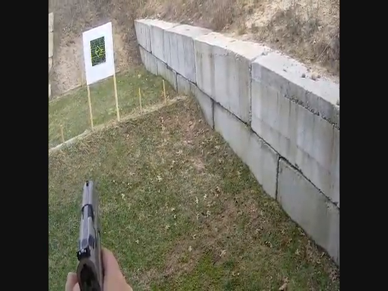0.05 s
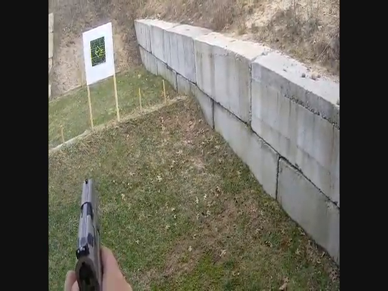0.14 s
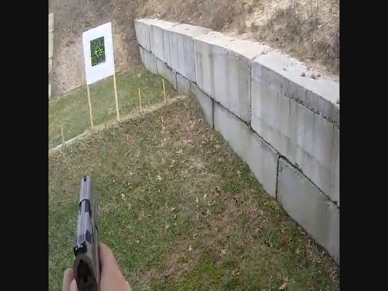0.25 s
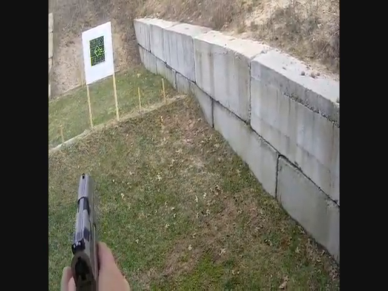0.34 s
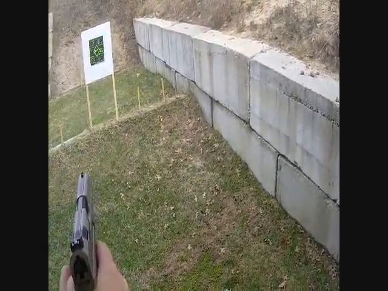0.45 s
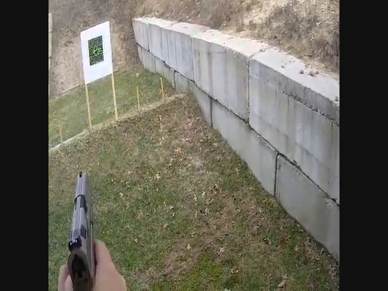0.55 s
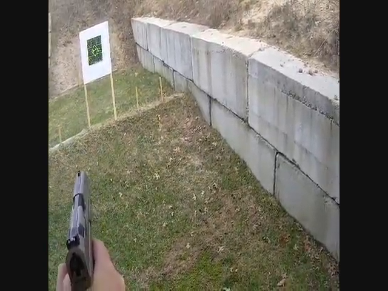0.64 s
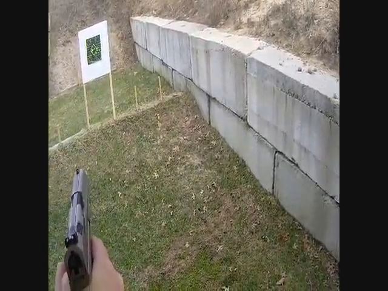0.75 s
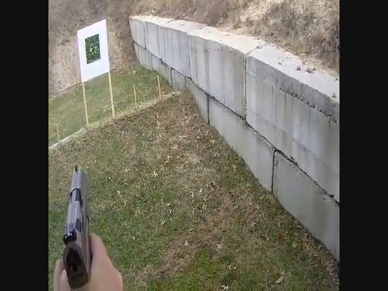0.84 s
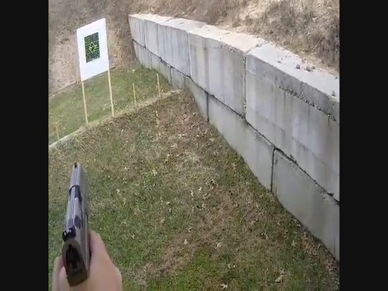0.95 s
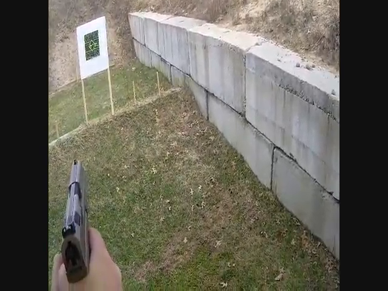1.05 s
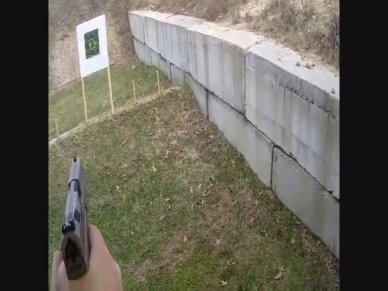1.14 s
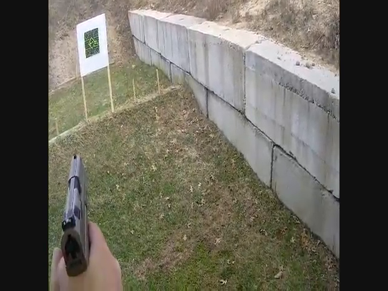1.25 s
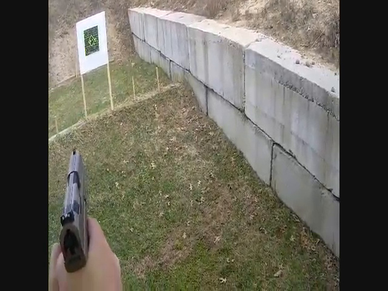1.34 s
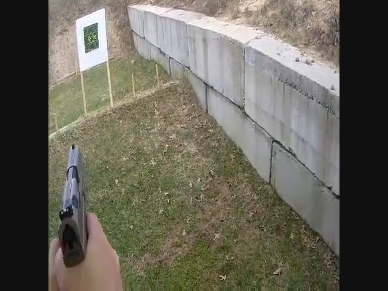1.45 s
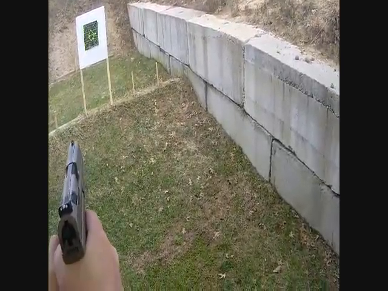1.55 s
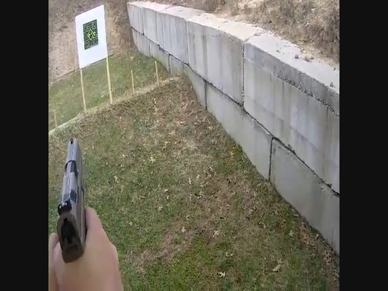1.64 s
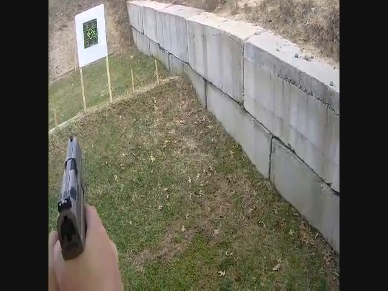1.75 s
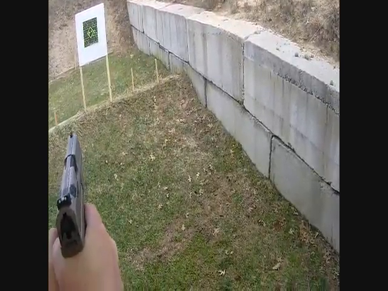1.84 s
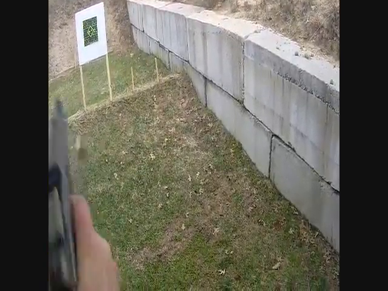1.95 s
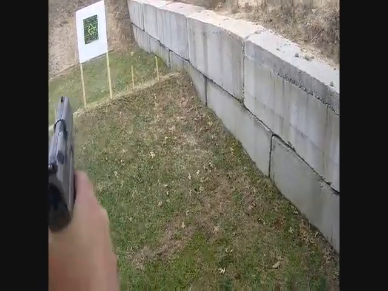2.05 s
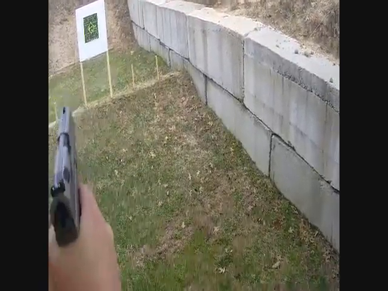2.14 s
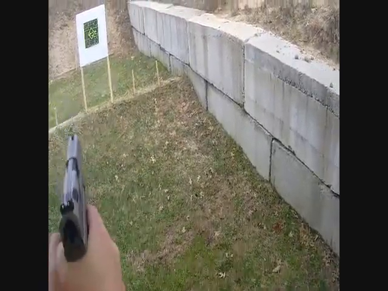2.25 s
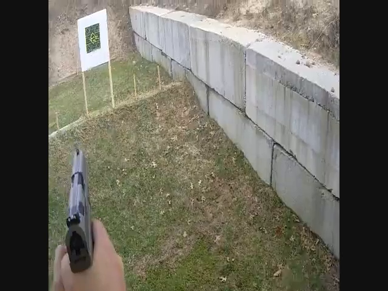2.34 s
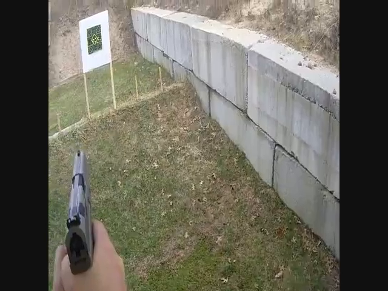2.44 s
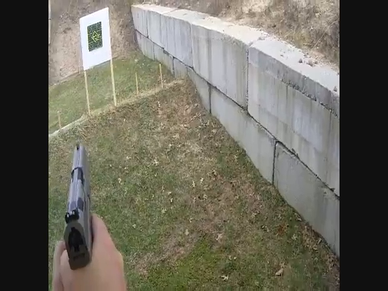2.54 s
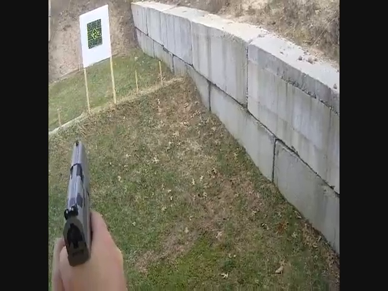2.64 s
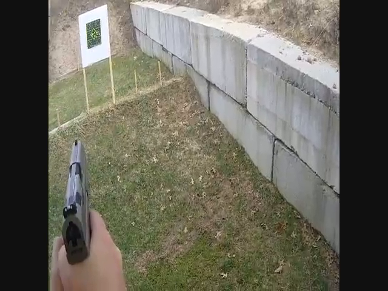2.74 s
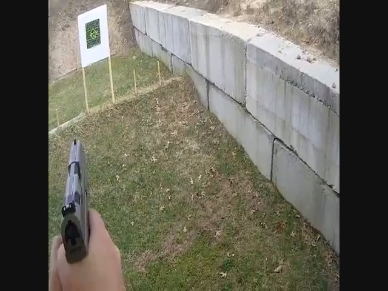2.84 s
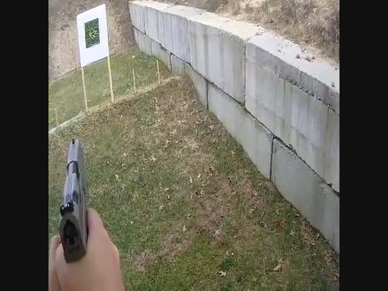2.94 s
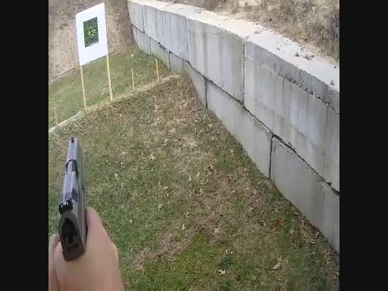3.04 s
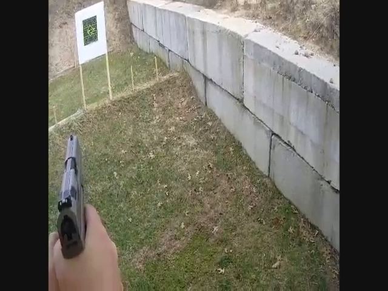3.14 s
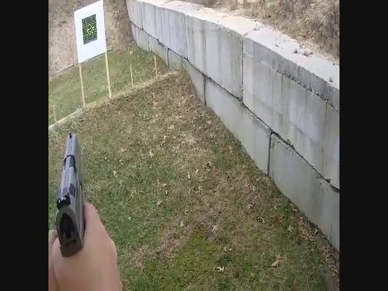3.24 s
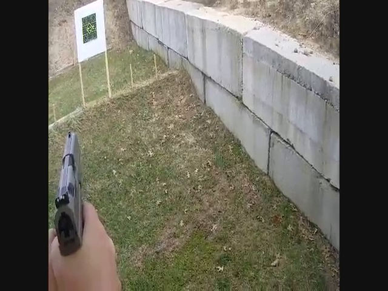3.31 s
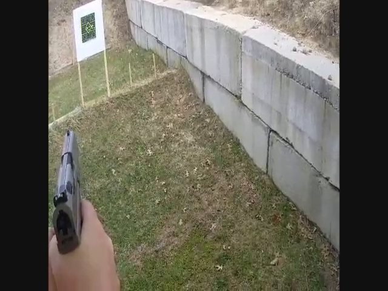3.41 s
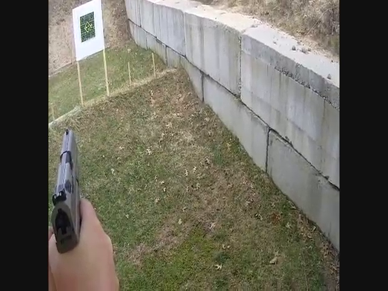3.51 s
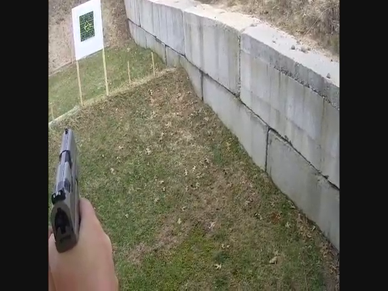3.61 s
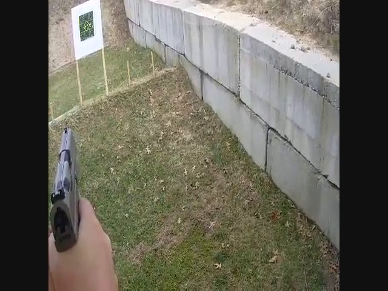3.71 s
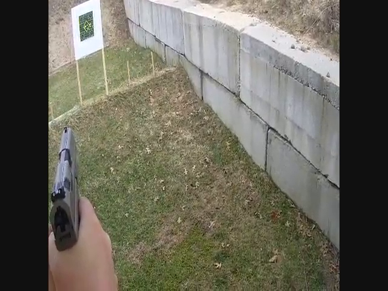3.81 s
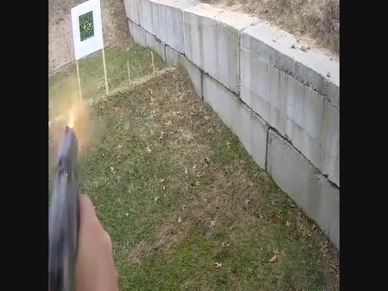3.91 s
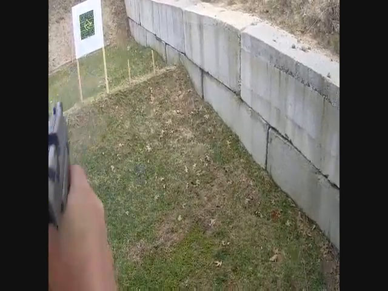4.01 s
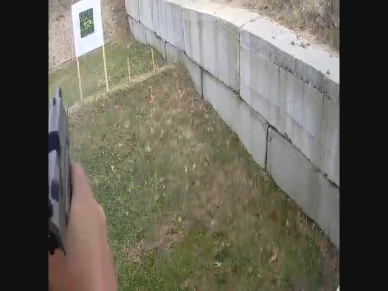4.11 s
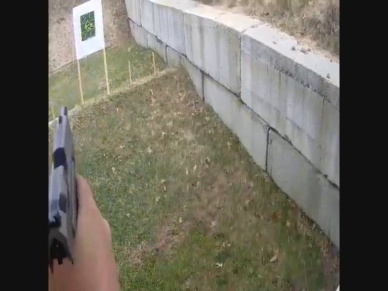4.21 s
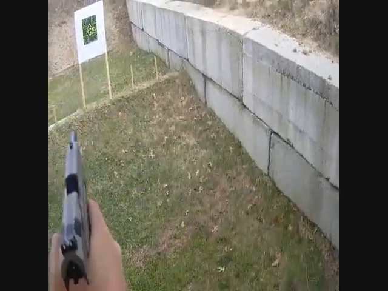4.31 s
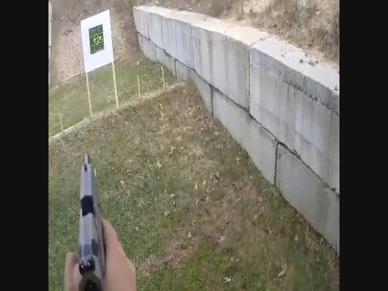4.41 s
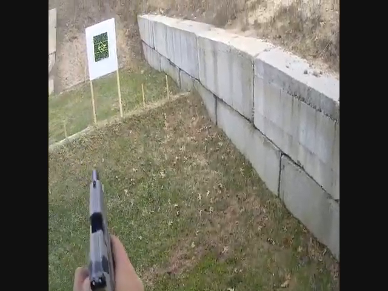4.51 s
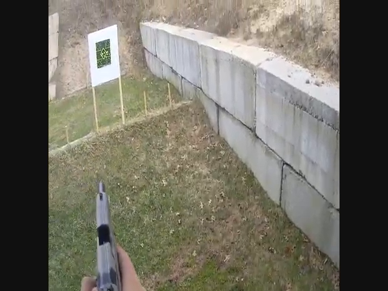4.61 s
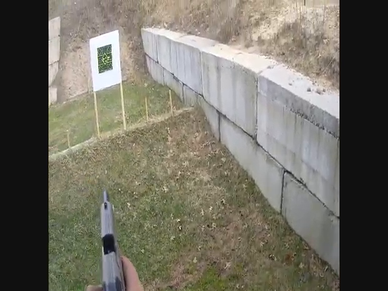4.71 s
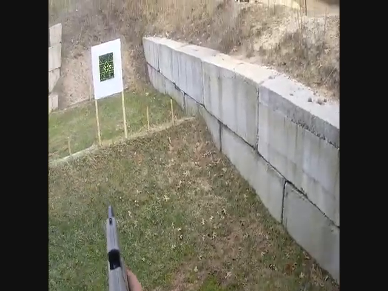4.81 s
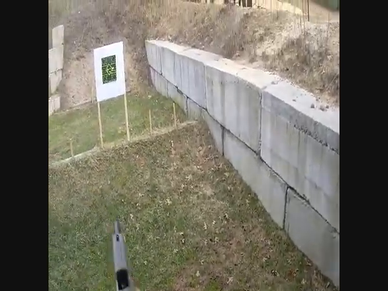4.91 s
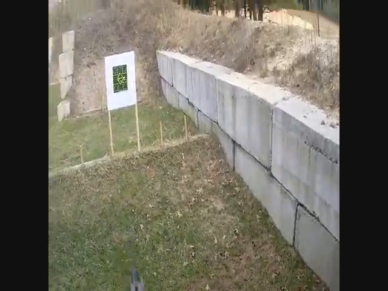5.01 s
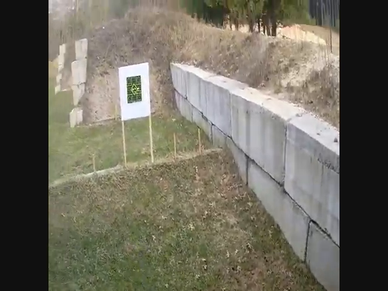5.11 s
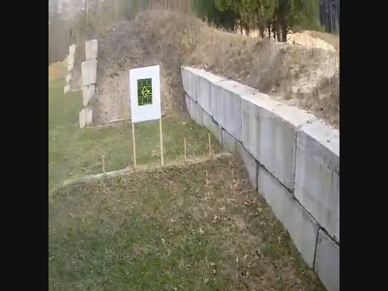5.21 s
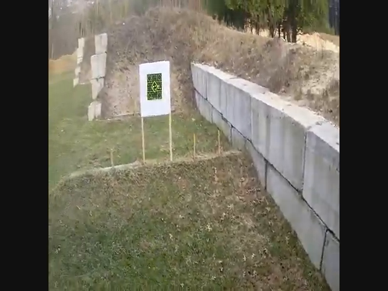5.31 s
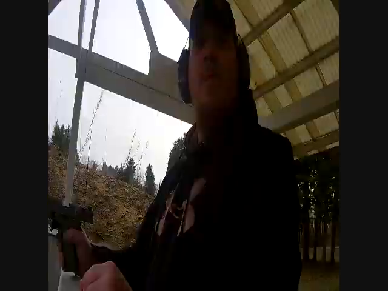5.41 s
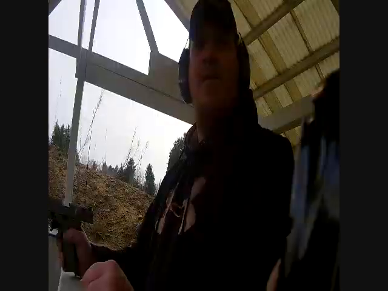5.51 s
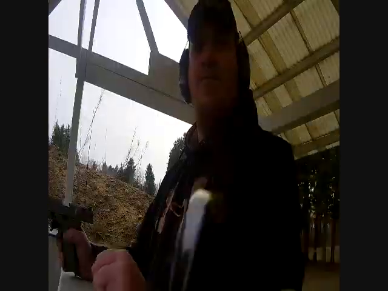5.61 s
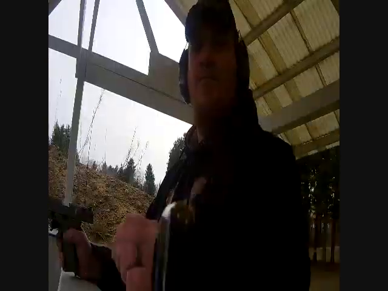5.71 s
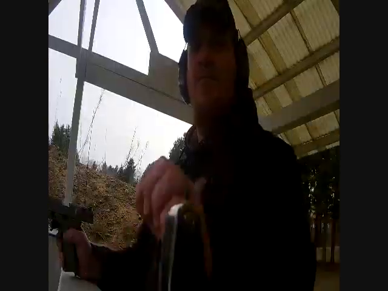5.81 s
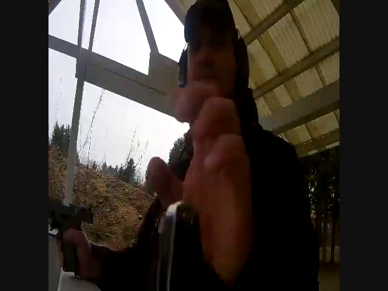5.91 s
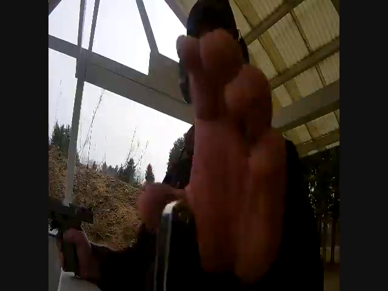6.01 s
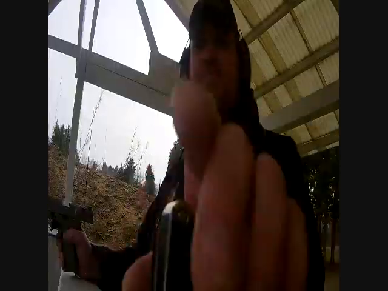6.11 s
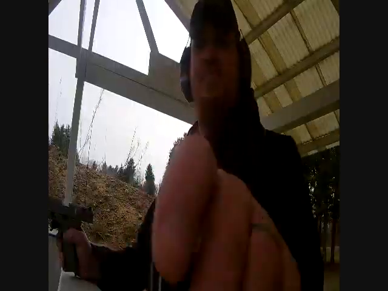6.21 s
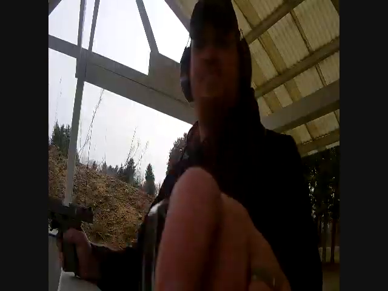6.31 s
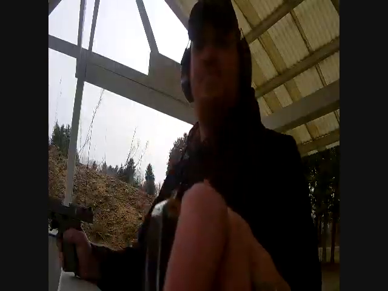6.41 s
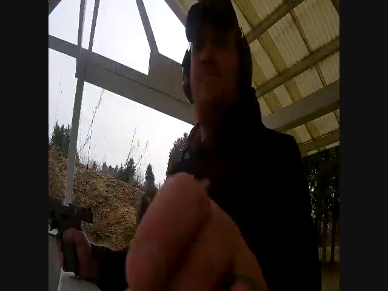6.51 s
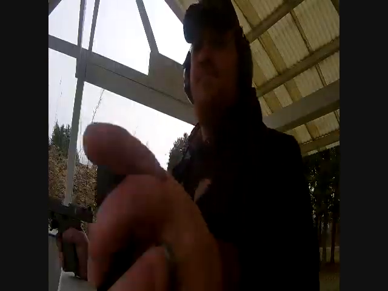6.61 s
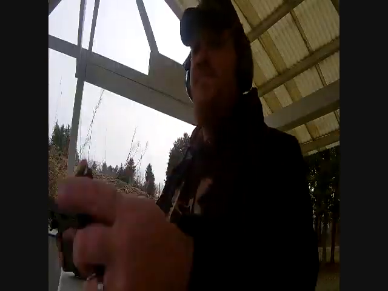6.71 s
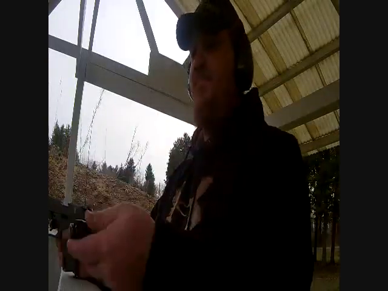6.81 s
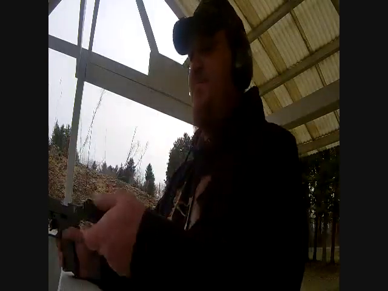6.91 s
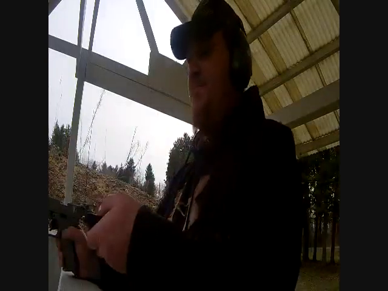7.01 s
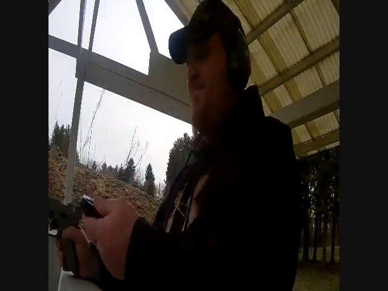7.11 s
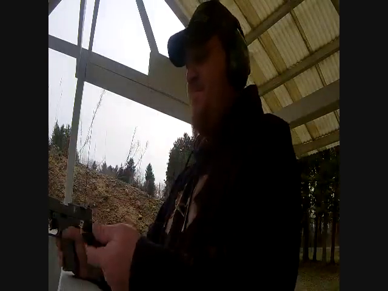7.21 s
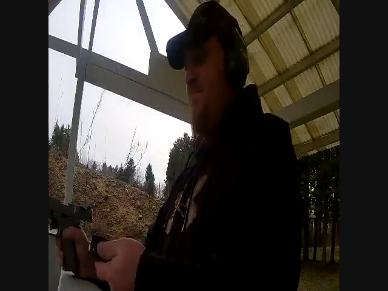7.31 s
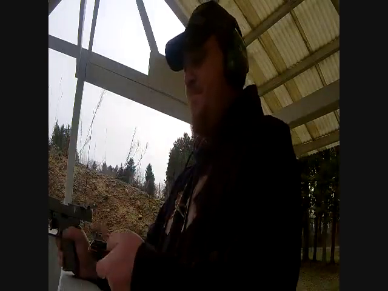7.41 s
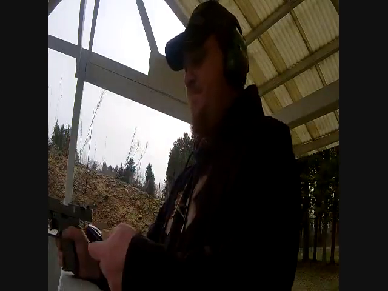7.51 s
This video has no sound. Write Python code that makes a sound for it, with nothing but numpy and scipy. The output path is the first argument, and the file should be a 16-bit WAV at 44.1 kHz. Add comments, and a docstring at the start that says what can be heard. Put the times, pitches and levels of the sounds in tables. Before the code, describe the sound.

A pistol fires twice at an outdoor range with short echoes and thin casing pings, before a dull knock and soft handling noise.

```python
"""A grassy shooting bay with concrete block walls, heard from a camera in a plastic housing.
A pistol fires twice. Each blast and its echoes make the housing ring and overload the microphone.
After each shot the empty brass case lands and bounces with a thin ping.
Later, fingers rub the camera and knock it once. A steady outdoor hush lies under it all."""
import sys
import numpy as np
from scipy import signal
from scipy.fft import rfft, irfft, next_fast_len
from scipy.io import wavfile
from scipy.ndimage import map_coordinates

SR = 44100
rng = np.random.default_rng(int(sys.argv[2]) if len(sys.argv) > 2 else 0)


def transcribe(u):
    """Save the signal u as a 16-bit wav file named by the first command-line argument.

    u: samples, shape (n,) or (channels, n), limited to [-1, 1]; the rate is SR.
    q: integer samples, one column per channel.
    """
    v = np.clip(np.atleast_2d(u).T, -1, 1)
    q = np.round(v * 32767).astype(np.int16)
    wavfile.write(sys.argv[1], SR, q)


N = 332955

# The shots. Each row: start in seconds, level in dB, level of the low push of air in dB.
SHOT_EVENTS = [(2.0276, -3, -9.5), (4.0235, -3, -5)]
# Echoes off the walls and earth banks. Each entry: delay in seconds.
WALL_DELAYS = [.0161, .0232, .042, .054, .089, .117, .155, .213, .227]
# Scattered sound dies fast in the bay, slower between the banks, slowest over the land.
# Each row: level in dB, t60 in seconds (the time it takes to fade by 60 dB).
SPACE_DECAYS = [(17.5, 0.21), (-9, .6), (-34.5, 2.25)]
# How far travel colours an echo. Each row: frequency in Hz, boost or cut in dB.
DISTANCE_COLOUR = [(100, -2.5), (500, -1), (900, 1), (1300, 3), (4000, -0.5), (6000, -8.5), (9000, -15.5),
                   (12000, -23.5), (15500, -30)]
# What the housing lets through. Each row: frequency in Hz, boost or cut in dB.
HOUSING_COLOUR = [(30, -19.5), (200, -15), (400, -10), (650, -6), (1000, -1.5), (1750, 0), (1950, -5),
                  (2400, -3.5), (2750, 0), (4450, -2), (5000, -10), (7000, -6.5), (10000, -13),
                  (15500, -20.5)]
# Where the housing rings. Each row: pitch in Hz, width in Hz, boost in dB.
HOUSING_RINGS = [(910, 66, 0.33), (1124, 110, 7), (1315, 240, 14.5), (1720, 140, 5.7)]
# Cases hitting the floor. Each row: start in seconds, ring level in dB, pitch in Hz,
# ring t60 in seconds, tap level in dB.
CASE_BOUNCES = [(2.8504, -52, 10960, 0.22, -57), (3.14, -75, 11000, .25, -63),
                (3.61, -72, 11000, 0.27, -80), (4.855, -55.5, 10740, 0.3, -51.5),
                (5.025, -61, 10760, 0.37, -55.5), (5.4191, -60, 10700, 0.15, -70)]
# A case's close-set tones. Each row: distance from its pitch in Hz, level in dB.
BRASS_TONES = [(-130, -10), (-30, 1), (96, -8.5)]
# The contacts within one knock. Each row: start in seconds, thud level in dB, click level in dB.
KNOCK_CONTACTS = [(5.7475, -27, -70), (5.751, -17.5, -52), (5.7562, -27.5, -50), (5.758, -31, -48)]
# The knocked camera's tones. Each row: pitch in Hz, level in dB, t60 in seconds.
CAMERA_TONES = [(105, -2, 0.044), (178, -3, 0.029), (227, 2, 0.026), (310, -15, 0.062), (554, -12.5, 0.046),
                (703, -7, 0.051), (1226, -2.5, 0.021), (1670, -12.5, 0.039), (2170, -23, .02),
                (2690, -26.5, .03), (2950, -30, .02), (4200, -29, .022), (8850, -32, .015)]
# Finger strokes. Each row: start in seconds, length in seconds, rub level in dB, scratch level in dB.
FINGER_STROKES = [(5.51, .15, -63.5, -63.5), (5.714, .22, -52.5, -85), (5.92, 0.17, -65, -90),
                  (6.39, 0.33, -62.5, -88)]
# Six colours of noise. Each row: frequency in Hz, relative level in dB.
CRACK_COLOUR = [(200, -20), (1500, -7.5), (4000, -0.5), (9000, 0.5), (15500, -8)]  # sharp cracks and clicks
RUMBLE_COLOUR = [(10, -13), (30, -1), (70, -3), (130, -3.5), (300, -14.5), (900, -54.5), (3000, -120)]  # slow pushes from air or a hand
TAP_COLOUR = [(1500, -19), (3000, -7), (3500, -8), (4400, 1), (4850, -6), (5200, 0), (5900, -17),
              (9000, -17), (14000, -16)]  # brass tapping the floor
RUB_COLOUR = [(700, -19), (1150, -5), (1360, 6.5), (1600, -7), (2200, -35)]  # the hollow housing being rubbed
SCRATCH_COLOUR = [(2300, -10), (2900, -15), (3130, 2.5), (3400, -23.5), (3900, -14), (4300, -1),
                  (4800, -20), (8000, -23), (8850, -9), (9600, -24)]  # fingers scratching plastic
HUSH_COLOUR = [(12, -31.5), (20, -2), (113, -2.5), (141, -1.5), (276, -2), (317, -3), (345, -2.5),
               (456, -5.5), (693, -8), (1600, -17), (1840, -17.5), (3220, -25), (14500, -37.5),
               (15800, -34.5)]  # outdoor air


def pistol(lead_s=0.0015, lead_db=-17, crack_db=17, crack_t60=0.032,
           push_t60=0.17, boom_db=-25, boom_t60=0.24):
    """Each shot is a tiny lead-in snap, a blast with its echoes, a bright crack and a low boom."""
    air, direct = np.zeros(N), np.zeros(N)
    t = np.arange(2 * SR) / SR
    for s, db, push_db in SHOT_EVENTS:
        shot = scattered_echoes(t) + blast_and_wall_echoes(t)
        start, lead = round(s * SR), round(lead_s * SR)
        air[start:start + len(t)] += amp(db) * dull_with_distance(shot)
        air[start - lead:start] += amp(lead_db) * np.linspace(0, 1, lead) * rng.standard_normal(lead)
        # the crack and the low sounds reach the microphone without ringing the housing
        age = since(s)
        direct += amp(db + crack_db) * fade(age, crack_t60) * noise(CRACK_COLOUR)
        low_strength = amp(push_db) * fade(age, push_t60) + amp(boom_db) * fade(age, boom_t60)
        direct += low_strength * noise(RUMBLE_COLOUR)
    return housing(air) + direct


def muzzle_blast(t, gas_t60=0.016, push_s=0.0005, push_db=4):
    """Air pressure jumps, then dips into suction, while swirling gas makes a burst of noise."""
    phase = t / push_s
    pressure = amp(push_db) * (t > 0) * (1 - phase) * np.exp(-phase)
    return pressure + fade(t, gas_t60) * rng.standard_normal(len(t))


def blast_and_wall_echoes(t, blast_db=22.5, echo_boost_db=4):
    """The blast arrives straight, then off each wall, weaker the longer its path."""
    walls = sum(lingering(delay) * muzzle_blast(np.maximum(t - delay, 0)) for delay in WALL_DELAYS)
    return amp(blast_db) * muzzle_blast(t) + amp(echo_boost_db) * walls


def scattered_echoes(t, clump_db=1.0, clumps_per_s=110):
    """Countless small echoes from blocks, grass and banks arrive in clumps."""
    clumps = amp(clump_db * wobble(t, clumps_per_s))
    return lingering(t) * clumps * rng.standard_normal(len(t))


def lingering(t):
    """How strong the echoes are t seconds after a shot; each space fades at its own rate."""
    return np.sqrt(sum(amp(db - 60 * t / t60) ** 2 for db, t60 in SPACE_DECAYS))


def dull_with_distance(x, dulling_s=0.18):
    """The later an echo arrives, the farther it has travelled and the more treble it has lost."""
    hz, seconds, spectrum = signal.stft(x, SR, nperseg=256)
    change_db = level_at(DISTANCE_COLOUR, hz)[:, None] * (1 - np.exp(-seconds / dulling_s))
    _, dulled = signal.istft(spectrum * amp(change_db), SR, nperseg=256)
    return dulled[:len(x)]


def housing(x, size=8192):
    """The plastic housing colours the sound and rings on after each push."""
    hz = np.fft.rfftfreq(size, 1 / SR)
    rings_db = sum(db / (1 + (2 * (hz - pitch) / width) ** 2) for pitch, width, db in HOUSING_RINGS)
    gain = amp(level_at(HOUSING_COLOUR, hz) + rings_db)
    # arrange the response so nothing rings before its cause ("minimum phase")
    cepstrum = irfft(np.log(gain))
    cepstrum[1:size // 2] *= 2
    cepstrum[size // 2 + 1:] = 0
    response = irfft(np.exp(rfft(cepstrum)))
    return signal.fftconvolve(x, response / np.linalg.norm(response))[:N]


def brass_cases(tap_t60=0.1, shimmer_depth=0.24, shimmer_hz=150):
    """Empty brass taps the floor and rings; nearby surfaces blur the ring."""
    out, tap = np.zeros(N), noise(TAP_COLOUR)
    shimmer = filtered(rng.standard_normal(N), lambda hz: 1 / (1 + (hz / shimmer_hz) ** 2))
    blur = 1 + shimmer_depth * unit(shimmer)
    t = np.arange(SR // 2) / SR
    for s, ring_db, pitch, t60, tap_db in CASE_BOUNCES:
        span = slice(round(s * SR), round(s * SR) + len(t))
        tones = sum(amp(db) * np.sin(2 * np.pi * (pitch + offset) * t) for offset, db in BRASS_TONES)
        out[span] += amp(ring_db) * fade(t, t60) * tones * blur[span]
        out[span] += amp(tap_db) * fade(t, tap_t60) * tap[span]
    return out


def camera_knock(click_t60=0.013, rise_s=0.001):
    """A hand bumps the camera: a few quick contacts, each a dull thud and a faint click."""
    out, t = np.zeros(N), np.arange(SR // 2) / SR
    tones = sum(amp(db) * fade(t, t60) * np.sin(2 * np.pi * hz * t) for hz, db, t60 in CAMERA_TONES)
    thud = (1 - np.exp(-t / rise_s)) * tones
    for s, thud_db, click_db in KNOCK_CONTACTS:
        out[round(s * SR):][:len(t)] += amp(thud_db) * thud
        out += amp(click_db) * fade(since(s), click_t60) * noise(CRACK_COLOUR)
    return out


def camera_handling(jerk_db=3.0, jerks_per_s=70, jolt_db=-41, jolt_t60=0.38):
    """Fingers slide jerkily with a hollow rub and a faint scratch; the knock leaves a low rumble."""
    jerks = amp(jerk_db * wobble(since(0), jerks_per_s))
    rub, scratch = noise(RUB_COLOUR), noise(SCRATCH_COLOUR)
    sliding = sum(finger_pressure(s, length) * (amp(rub_db) * rub + amp(scratch_db) * scratch)
                  for s, length, rub_db, scratch_db in FINGER_STROKES)
    knock_s = KNOCK_CONTACTS[0][0]
    jolt = amp(jolt_db) * fade(since(knock_s), jolt_t60) * noise(RUMBLE_COLOUR)
    return jerks * sliding + jolt


def finger_pressure(start, length, ramp_s=0.05):
    """A finger presses down, holds and lets go."""
    t = since(start)
    return np.clip(np.minimum(t, length - t) / ramp_s, 0, 1)


def outdoor_hush(level_db=-52.5):
    """Outdoor air makes a soft, steady, low noise."""
    return amp(level_db) * noise(HUSH_COLOUR)


def amp(db):
    """Turn decibels into a number to multiply by."""
    return 10 ** (np.asarray(db) / 20)


def unit(x):
    """Scale a sound to an average strength (rms) of 1."""
    return x / np.sqrt(np.mean(x ** 2) + 1e-20)


def level_at(colour, hz):
    """Look up dB in a colour table, sliding between rows by pitch."""
    row_hz, row_db = np.transpose(colour)
    return np.interp(np.log(hz + 1), np.log(row_hz + 1), row_db)


def since(s):
    """Seconds since time s, zero before it."""
    return np.maximum(np.arange(N) / SR - s, 0)


def fade(t, t60):
    """Silent until it starts, then falling 60 dB every t60 seconds."""
    return (t > 0) * np.exp(-np.log(1000) * t / t60)


def wobble(t, per_s):
    """A smooth curve through per_s random values a second."""
    return map_coordinates(rng.standard_normal(1024), [t * per_s], mode="mirror")


def filtered(x, gain):
    """Turn each frequency up or down by gain(hz)."""
    size = next_fast_len(N + SR // 2)
    return irfft(rfft(x, size) * gain(np.fft.rfftfreq(size, 1 / SR)), size)[:N]


def noise(colour):
    """Noise of the given colour, at strength 1."""
    return unit(filtered(rng.standard_normal(N), lambda hz: amp(level_at(colour, hz))))


def scene():
    """Everything that reaches the one microphone."""
    return (pistol() + brass_cases() + camera_knock() + camera_handling() + outdoor_hush())[None]


def record(dry, ceiling_db=-6.5, hardness=8, low_cut_hz=18, soften_hz=21000, hiss_db=-73, top_hz=15850):
    """The camera squashes the blasts nearly flat, adds faint hiss and trims the lowest and top tones."""
    squashed = dry[0] / (1 + np.abs(dry[0] / amp(ceiling_db)) ** hardness) ** (1 / hardness)
    trimmed = filtered(squashed, lambda hz: 1j * hz / (low_cut_hz + 1j * hz) / (1 + 1j * hz / soften_hz))
    hiss = amp(hiss_db) * rng.standard_normal(N)
    return filtered(trimmed + hiss, lambda hz: np.clip((top_hz - hz) / 200 + 0.5, 0, 1))[None]


dry = scene()
out = record(dry)
transcribe(out)
```